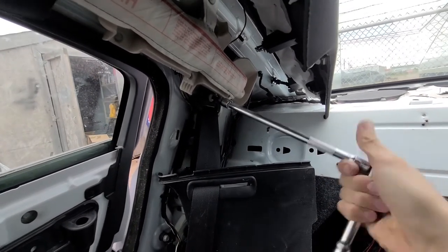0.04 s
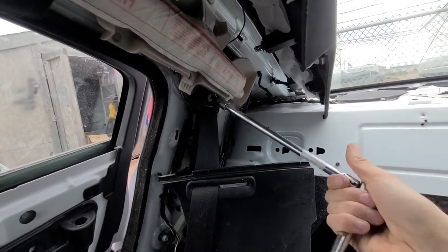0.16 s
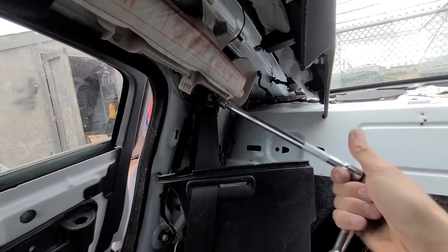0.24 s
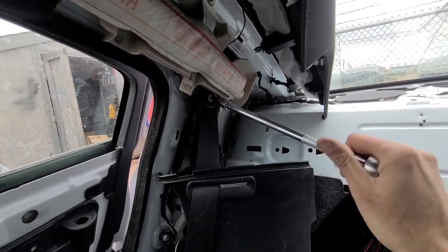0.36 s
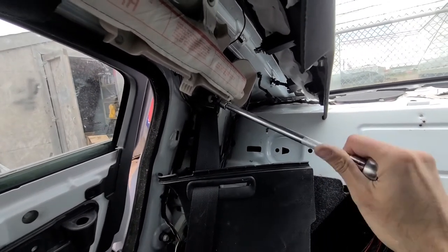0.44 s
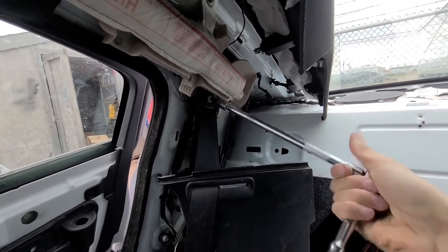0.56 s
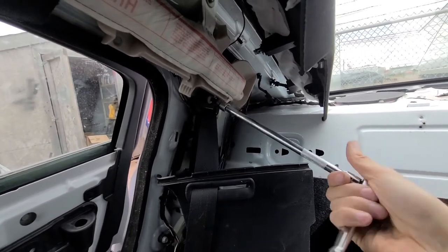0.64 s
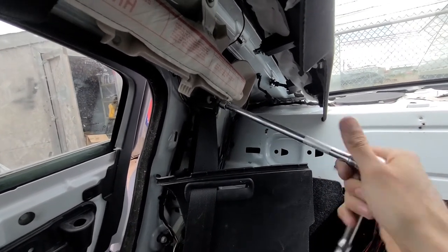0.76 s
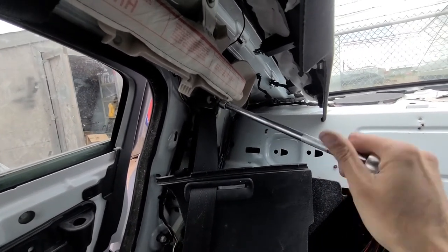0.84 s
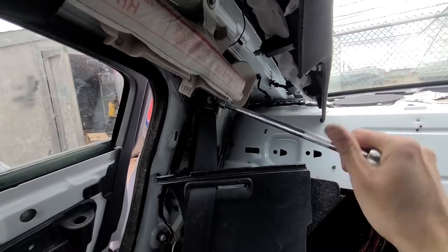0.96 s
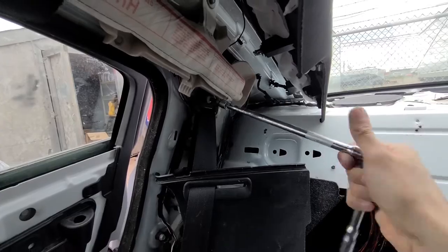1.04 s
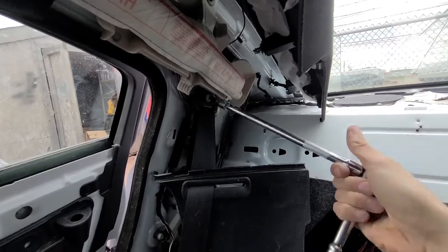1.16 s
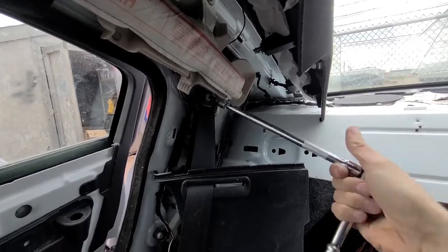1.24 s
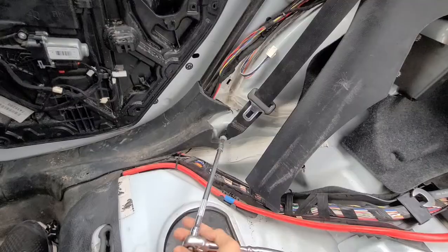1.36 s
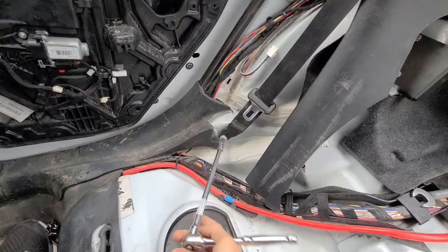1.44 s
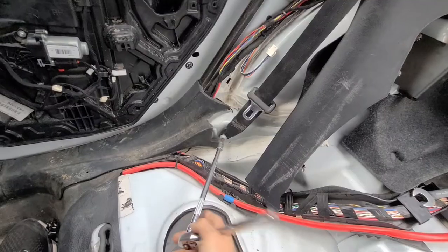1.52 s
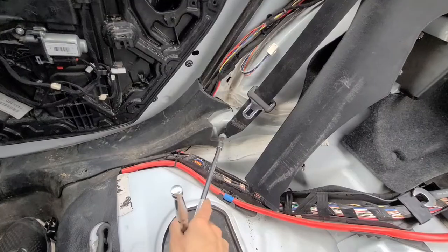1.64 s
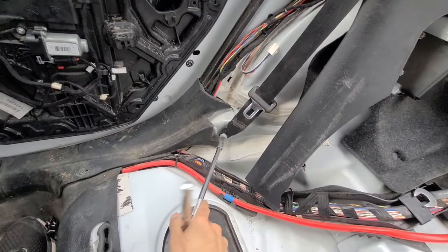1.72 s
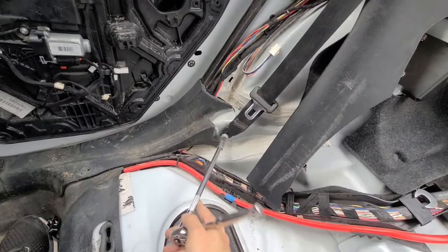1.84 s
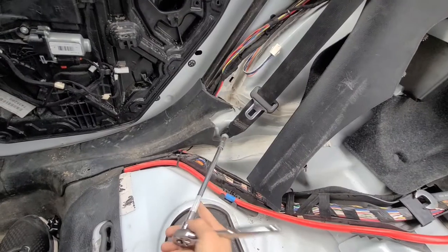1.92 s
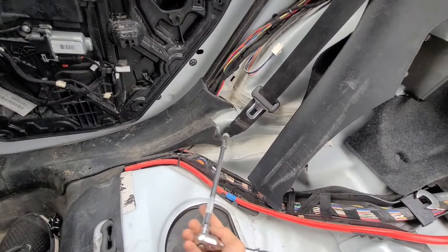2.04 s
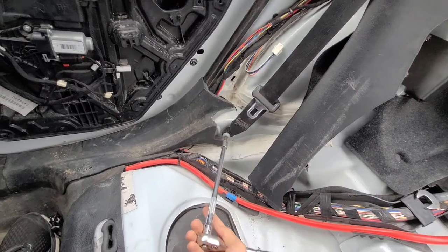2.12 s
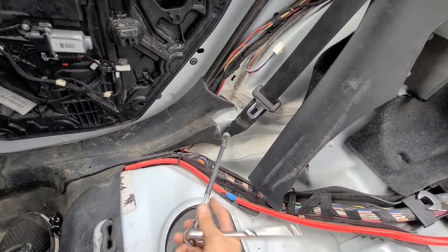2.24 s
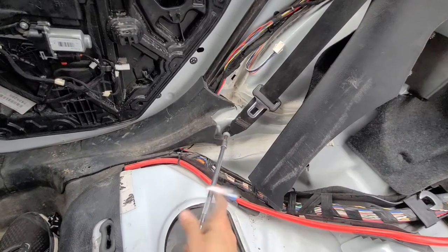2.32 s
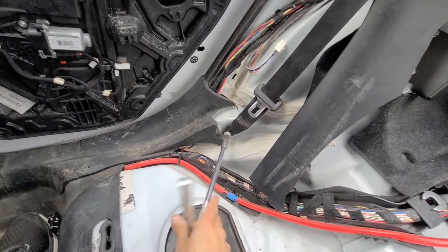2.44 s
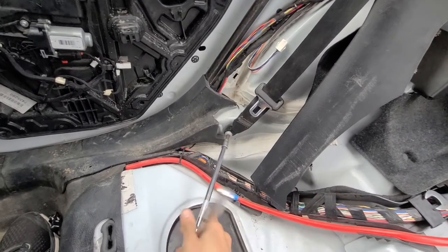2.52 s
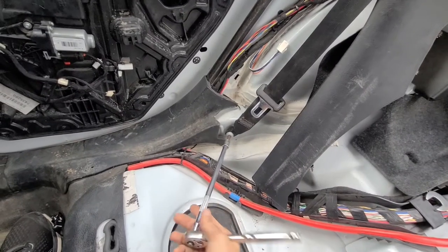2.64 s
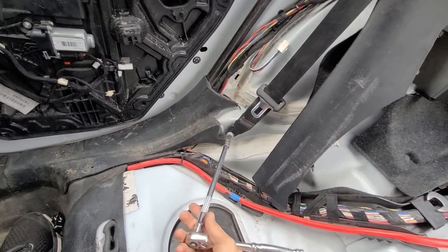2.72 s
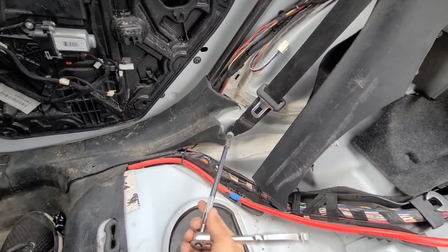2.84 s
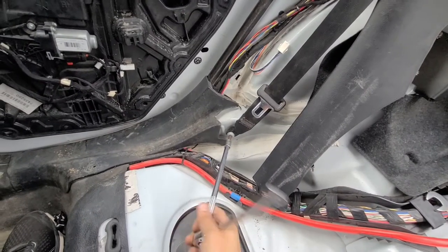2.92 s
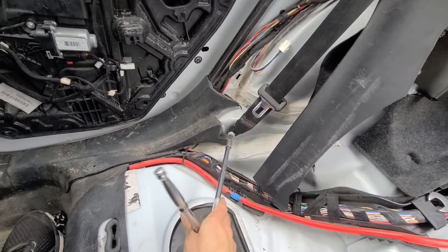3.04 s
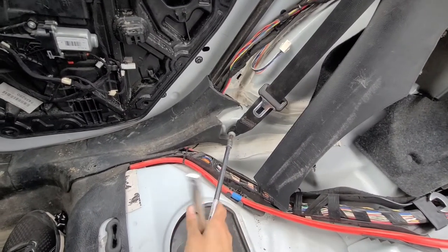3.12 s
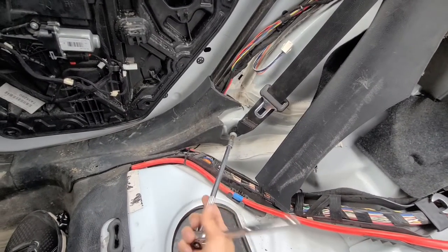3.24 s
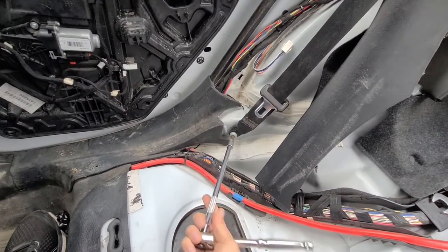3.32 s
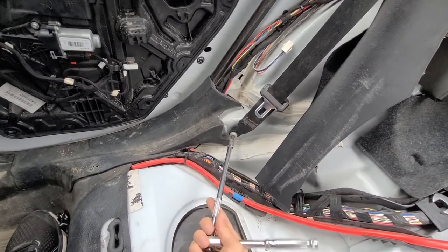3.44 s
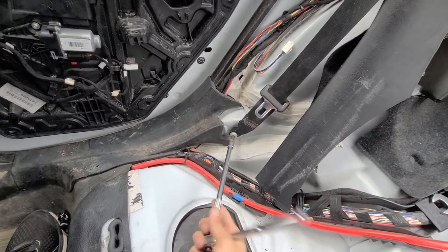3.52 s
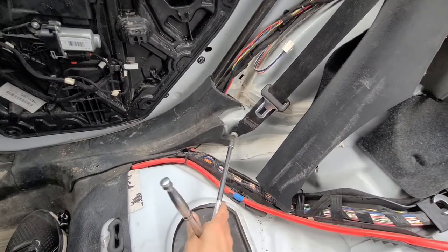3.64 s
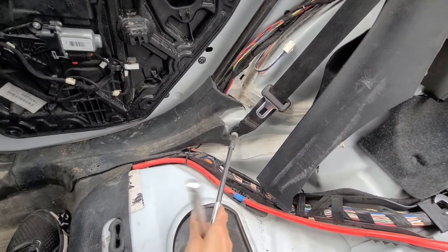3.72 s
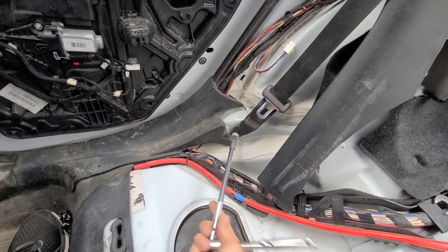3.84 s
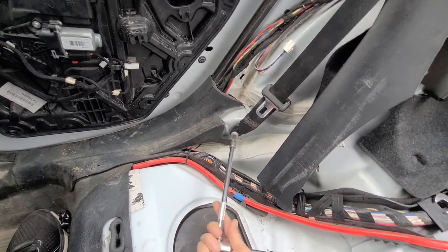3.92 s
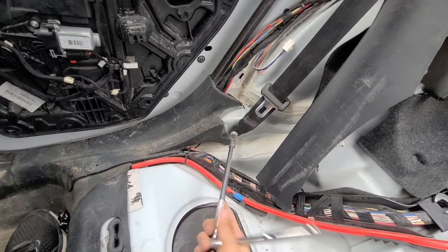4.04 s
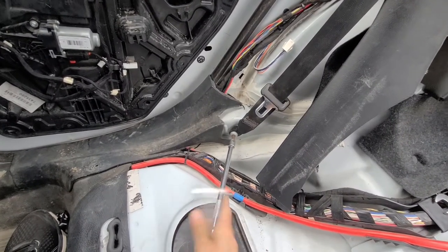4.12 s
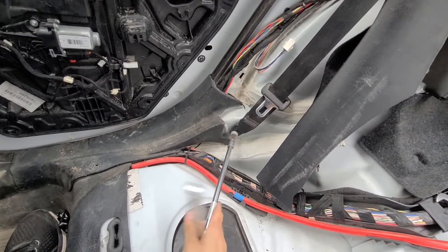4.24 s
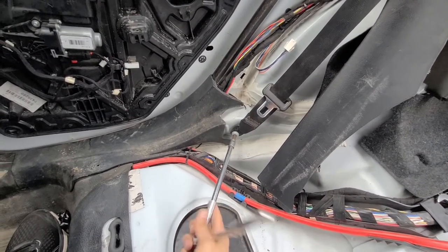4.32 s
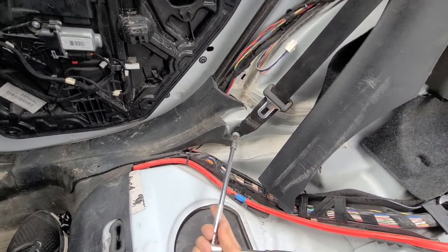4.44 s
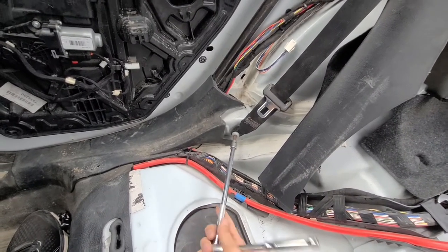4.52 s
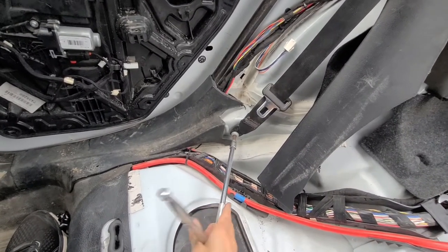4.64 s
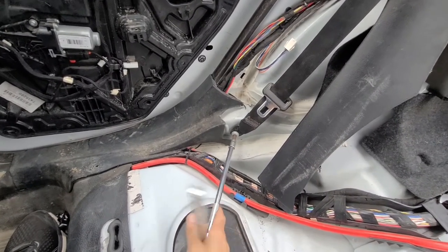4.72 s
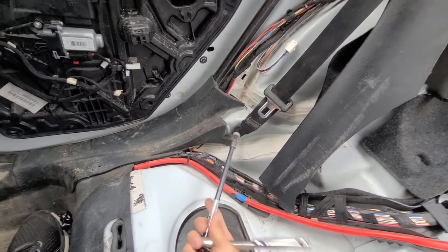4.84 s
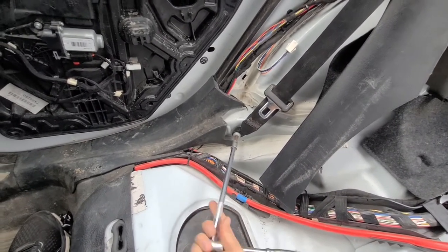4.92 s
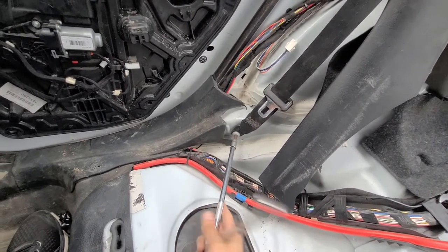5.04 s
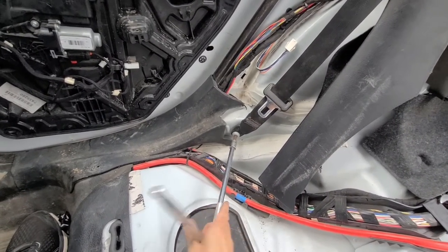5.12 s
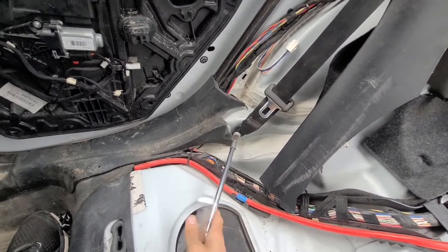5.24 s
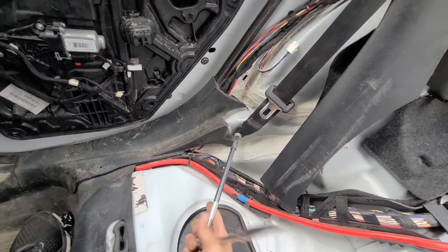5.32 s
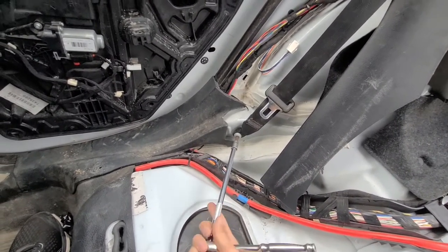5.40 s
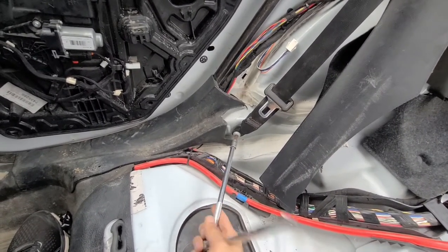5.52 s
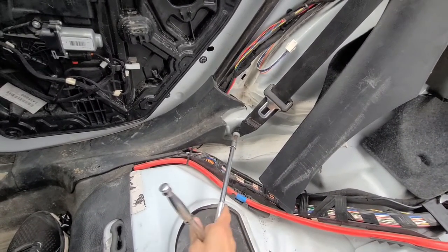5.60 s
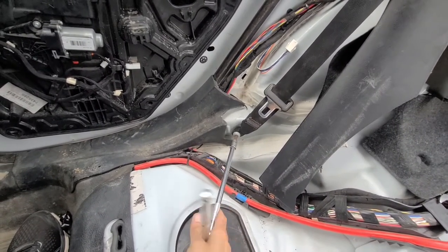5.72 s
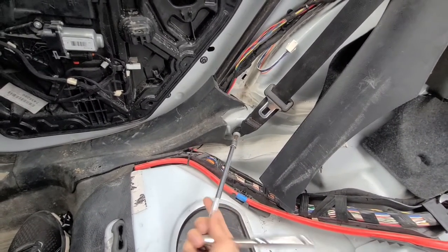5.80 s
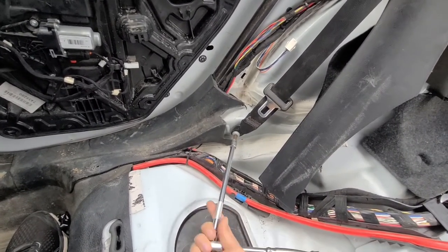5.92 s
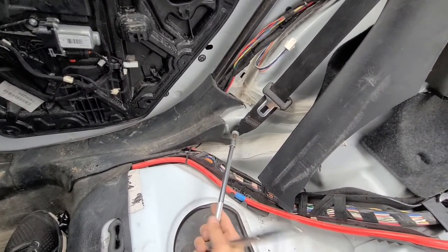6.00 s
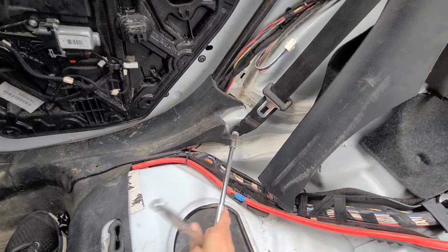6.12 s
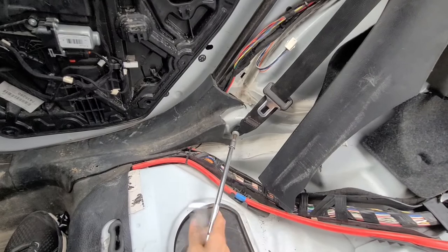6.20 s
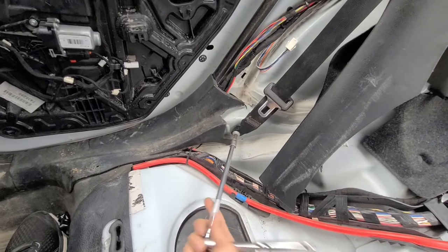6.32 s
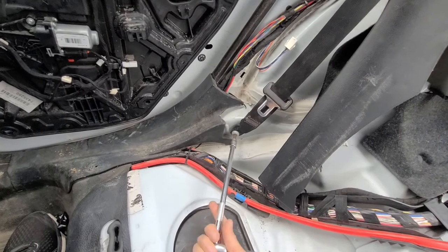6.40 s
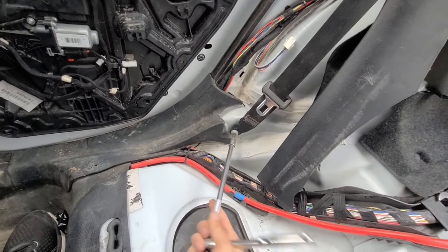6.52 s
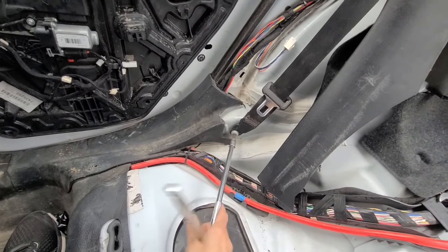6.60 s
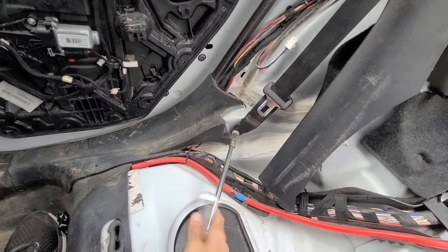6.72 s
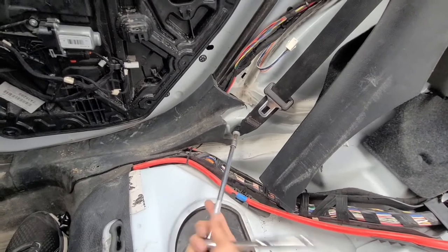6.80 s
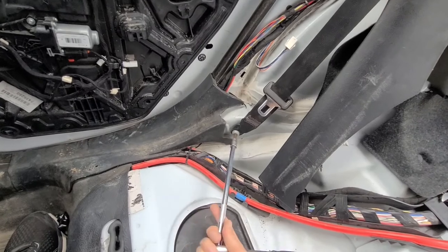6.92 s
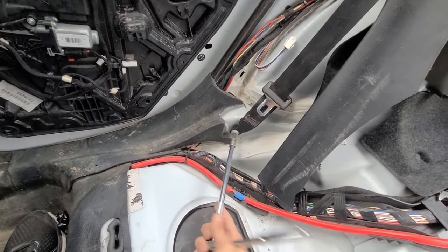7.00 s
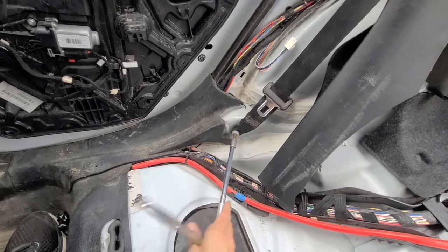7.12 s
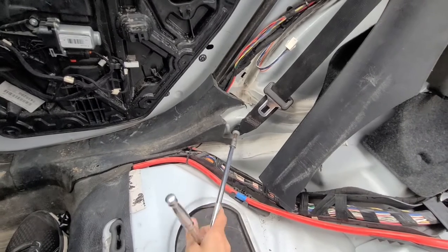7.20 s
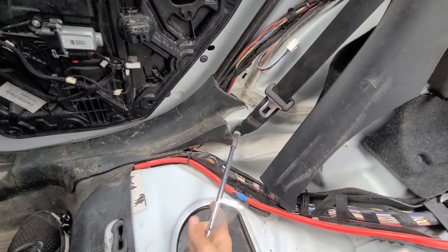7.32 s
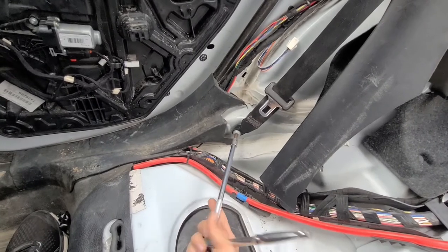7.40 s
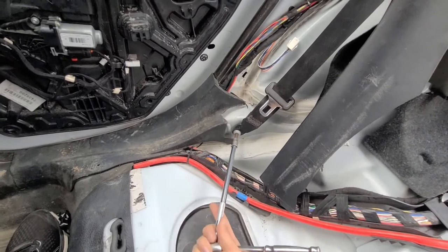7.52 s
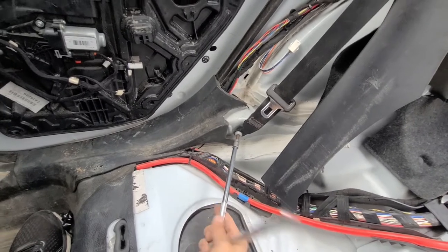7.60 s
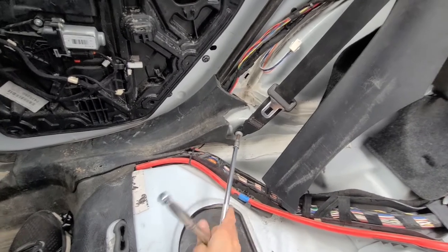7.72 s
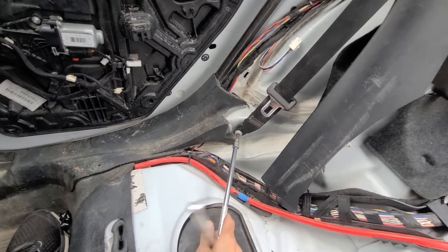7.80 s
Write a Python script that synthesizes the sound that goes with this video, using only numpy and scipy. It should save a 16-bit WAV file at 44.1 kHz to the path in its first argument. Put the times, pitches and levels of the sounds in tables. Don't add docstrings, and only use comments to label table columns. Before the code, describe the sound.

Heard close in stereo, a hand ratchet works inside a stripped car body. From 0 s dull, boomy knocks come through the door pillar, over a low hum from the leaning hand and a little rumble. A dense run of bright clicks rattles at 0.23-0.37 s, followed by loose knocks and clinks, then a second run at 0.71-0.86 s and a few more knocks. A small tick at 1.23 s leads into about 0.05 s of silence. Then the tighter floor pan: a short run at 1.47 s, others near 2.2 and 2.85 s, then crisp runs roughly every half second from 3.5 to 7.7 s. Each zip of clicks rings the steel bar; between them the pull brings a clink and a knock, the heaviest near 7.17 s. Faint socket scrapes, soft rumble and airy hiss stay underneath.

```python
import sys
import numpy as np
from scipy import signal
from scipy.fft import rfft, irfft, next_fast_len
from scipy.io import wavfile
from scipy.ndimage import uniform_filter1d

SR = 44100
rng = np.random.default_rng(int(sys.argv[2]) if len(sys.argv) > 2 else 0)


def volts_from_db(level):
    exponent = np.asarray(level, float) / 20
    return 10 ** exponent


def store_wav(level_fs):
    pcm = np.round(np.clip(np.atleast_2d(level_fs), -1, 1) * 32767)
    wavfile.write(sys.argv[1], SR, pcm.T.astype(np.int16))


N = 346626
SIZE = 5120
LEAD_MS = 10

# start_s, end_s
CUT = (1.2397, 1.2943)
# pitch_hz, width_hz, level_db
PILLAR_MODES = [(114, 34, -5.5), (199.7, 9, 2.5), (270, 29, -5), (363, 120, 0), (470, 15.5, 2.5),
                (551, 15, 0), (744, 112, -4), (1133, 133, -7.5), (1500, 55, -10.5), (2010, 280, -19.5)]
# pitch_hz, width_hz, level_db
PAN_MODES = [(106, 45, -28.5), (280, 20.2, 1), (450, 32, -1), (567, 15.2, -1.5), (660, 25, 5), (828, 16, 5),
             (1183, 31, 2.5), (1372, 117, -3), (1890, 103, -2), (2124, 88, -4)]
# pitch_hz, width_hz, level_db
FLOOR_MODE = (105, 26.4, 1.5)
# first_snap_s, last_snap_s
SWINGS = [(.234, .374), (.712, .86), (1.471, 1.568), (2.197, 2.335), (2.851, 3.003), (3.477, 3.605),
          (4.005, 4.137), (4.513, 4.64), (4.994, 5.128), (5.5, 5.581), (5.988, 6.096), (6.489, 6.593),
          (7.0, 7.143), (7.599, 7.687)]


def read(points, hz):
    f, value = np.transpose(points)
    return np.interp(np.log(hz + 1), np.log(f + 1), value)


def evened(x):
    return x / np.sqrt(np.mean(np.abs(x[0]) ** 2) + 1e-20)


def modes(table, hz, spread_db):
    f, width, db = np.transpose(table)[:, :, None]
    loads = volts_from_db(db + spread_db * rng.standard_normal(f.shape))
    loads = loads * rng.choice([-1, 1], f.shape)
    return (loads / (1 + 2j * (hz - f) / width)).sum(0)


def tilt(hz, db, pivot_hz):
    return volts_from_db(db * hz ** 2 / (hz ** 2 + pivot_hz ** 2))


def burst(rise_ms, start, hold_ms, tail_ms, tail_db, grit_db):
    ms = np.arange(SIZE) * 1000 / SR - LEAD_MS
    lead_in = .14 * (1 + ms / LEAD_MS) ** 2
    swell = np.where(ms < 0, lead_in, start + (1 - start) * np.clip(ms / rise_ms, 0, 1))
    after = np.maximum(ms - rise_ms, 0)
    tail = volts_from_db(min(tail_db, -7)) * np.exp(-(after / tail_ms) ** 2)
    fall = np.exp(-(after / hold_ms) ** 2) + tail
    wobble = uniform_filter1d(rng.standard_normal(SIZE), size=16)
    grit = volts_from_db(grit_db * 3.13 * wobble)
    return swell * fall * grit * rng.standard_normal((2, SIZE))


def add(mix, s, db, drive, response, peak_ms):
    fade = np.minimum(np.linspace(4, 0, SIZE), 1)
    sound = irfft(rfft(drive) * response, SIZE) * fade
    peak = uniform_filter1d(sound[0] ** 2, size=round(peak_ms * SR / 1000)).max()
    begin = round((s - LEAD_MS / 1000) * SR)
    part = mix[:, begin:][:, :SIZE]
    part += (volts_from_db(db) / np.sqrt(peak) * sound)[:, :part.shape[1]]


def drone(colour, level_db, patchy_db):
    frames, hz = N // 256 + 5, np.fft.rfftfreq(1024, 1 / SR)
    a, b, c, d, patches = rng.standard_normal((frames, 513, 5)).T
    patches = uniform_filter1d(patches, size=10, axis=0)
    patches = uniform_filter1d(patches, size=10, axis=1) * 10
    spectrum = np.array([a + 1j * b, c + 1j * d])
    spectrum = spectrum * volts_from_db(read(colour, hz)[:, None] + patchy_db * patches)
    noise = signal.istft(spectrum, nperseg=1024, noverlap=768)[1][:, :N]
    return volts_from_db(level_db) * evened(noise)


def leaning_hum():
    # pitch_hz, level_db (per Hz)
    colour = [(50, -31), (110, 8), (190, 5.5), (280, 6), (450, -12.5), (800, -24), (2000, -69)]
    # start_s, level_db
    leaning = [
        (0, -29),
        (.08, -26.5),
        (.17, -34.5),
        (.33, -34),
        (.55, -39),
        (.7, -37),
        (.9, -34),
        (1.04, -40.5),
        (1.12, -57),
        (1.2, -71),
    ]
    level_db = np.interp(np.arange(N) / SR, *np.transpose(leaning), right=-120)
    return drone(colour, level_db, 2.9)


def rumble_and_hiss():
    # pitch_hz, level_db (per Hz)
    rumble = [(30, -24.5), (50, 7), (78, 0.5), (130, -21), (250, -17.5), (600, -34), (1500, -67.5)]
    # pitch_hz, level_db (per Hz)
    hiss = [(400, -0.5), (830, 17.5), (970, -1), (1180, 13), (1700, -0.5), (4000, -5), (7500, -12.5),
            (9200, -13.5), (11800, -13), (15500, -21)]
    # start_s, level_db
    stir_points = [(.06, -27), (.14, -50), (.5, -25), (.66, -52), (.97, -33), (1.06, -32.5), (1.11, -61),
                   (1.24, -42), (1.3, -48), (1.95, -50), (2.7, -49), (3.8, -46), (5.3, -49.5), (6.28, -46),
                   (6.9, -48.5), (7.45, -49.5), (7.86, -43.5)]
    pull_db, pull_after_s, pull_width_s = 6.5, 0.257, 0.069
    t = np.arange(0, N, 100) / SR
    at_pillar = t < CUT[0]
    pulls = sum(np.exp(-((t - first - pull_after_s) / pull_width_s) ** 2) for first, _ in SWINGS)
    stir_db = np.interp(t, *np.transpose(stir_points)) + pull_db * pulls * ~at_pillar
    base_db = np.where(at_pillar, -58.5, -51)
    share = np.where(at_pillar, 0.8, 0.95)
    hiss_db = base_db + share * (stir_db + 40)
    rumble_db, hiss_db = [np.repeat(db, 100)[:N] for db in (stir_db, hiss_db)]
    return drone(rumble, rumble_db, 0.61) + drone(hiss, hiss_db, 1.6)


def knocks(rows, panel, plain_db, hold_ms, thud_db, boom_db, contact_db):
    out, hz = np.zeros((2, N)), np.fft.rfftfreq(SIZE, 1 / SR)
    damped = [(f, width * 1.7, db) for f, width, db in panel]
    large_sheets = [FLOOR_MODE] + [(f, width * 1.07, 0) for f, width, _ in panel[:3]]
    thud = volts_from_db(thud_db) / (1 + 1j * hz / 3000) ** 3 * hz / (hz + 150)
    for s, db, rise_ms, bright_db, sings_hz in rows:
        bent_hz = hz * (1 + .012 * rng.standard_normal())
        body = modes(damped, bent_hz, spread_db=2.5) + thud
        body = body * tilt(hz, bright_db - plain_db, pivot_hz=750)
        low, high = round(.8 * sings_hz * SIZE / SR), round(1.25 * sings_hz * SIZE / SR)
        nearby = np.abs(body)[low:high].max()
        body = body + nearby * .9 / (1 + 2j * (hz - sings_hz) / (30 + .05 * sings_hz))
        add(out, s, db, burst(max(rise_ms, 1), .4, hold_ms, 28, -8, grit_db=2.5), body, 6)
        contact = burst(0.52, 0.37, 1.0, 4, -29, grit_db=1.5)
        add(out, s, db + contact_db, contact, thud * hz / (hz + 800), 3)
        boom = modes(large_sheets, hz, spread_db=-4.0)
        swell = burst(23.0, 0.2, 27, 66, 6.5, grit_db=-1.0)
        add(out, s, db + boom_db - 0.27 * bright_db, swell, boom, 10)
    return out


def pillar_knocks():
    # start_s, level_db, rise_ms, brightness_db, strongest_mode_hz
    rows = [(0.012, -15, 0.99, -14.5, 313), (0.104, -19, 3, -26, 270), (0.192, -20.5, 3.5, -19, 406),
            (0.257, -16, 4.5, -11, 203), (0.316, -35, 22, 14, 470), (0.391, -34.5, 37, -33.5, 148),
            (0.44, -28, 46, -13, 320), (0.46, -26, 12, -9.5, 280), (0.483, -26, 65, -26, 177),
            (0.547, -26, 22, -20.5, 388), (0.608, -18.5, 10.5, -18.5, 450), (0.622, -27, 5.3, -19, 390),
            (0.645, -29, 88, -22, 159), (0.868, -32, 71, -16, 147), (0.939, -22, 15.4, -9.5, 453),
            (1.007, -22.5, 8.9, -13, 190), (1.029, -40.5, 68, -50, 180), (1.074, -59, 13, -33, 178),
            (1.116, -47, 5, -49, 196)]
    return knocks(rows, PILLAR_MODES, -4.0, 3.3, -32.5, -22.0, -26.5)


def thumps():
    # start_s, level_db
    shoves = [(.012, -36.5), (0.102, -29.5), (.257, -38.5), (.3, -27.5), (.345, -23.5), (.49, -28.5),
              (0.607, -25), (1.401, -38.5), (2.439, -22.5), (2.469, -28), (2.511, -41), (3.051, -33.5),
              (3.413, -35), (4.217, -47), (4.696, -32), (5.159, -41), (6.16, -51), (6.697, -37),
              (6.956, -51), (7.17, -32), (7.563, -28.5), (7.803, -38)]
    out, hz = np.zeros((2, N)), np.fft.rfftfreq(SIZE, 1 / SR)
    for s, db in shoves:
        sheets = modes([FLOOR_MODE, (125, 40, 0), (180, 50, -3)], hz, spread_db=0.5)
        add(out, s, db, burst(6.0, 0.49, 26, 48, -7, grit_db=5.5), sheets, 15)
    return out


def hand_points():
    # treble_db (head turned to the microphone), push_db (into the panel)
    grips = [
        [7.5, 1.5],
        [20.5, 0.5],
        [9, -15],
        [9, -10.5],
        [-0.5, -13],
        [-2, -17.5],
        [-7, -12.5],
        [-3, -13.5],
        [-5, -15.5],
        [-6.5, -21],
        [-5.5, -13.5],
        [-5, -16],
        [-8, -12.5],
        [-6, -17.5],
    ]
    hand = [(0.0035, 5, 4)]
    for (first, last), (treble_db, push_db) in zip(SWINGS, grips):
        hand.append((first, treble_db, push_db))
        hand.append((last, treble_db - 3, push_db + 1))
    return hand


def steel_snaps():
    # start_s, level_db
    teeth = [(0.2333, -28), (0.2489, -29), (0.2583, -26), (0.2713, -31), (0.2817, -27), (0.2929, -26),
             (0.2972, -26), (0.309, -26), (0.3215, -25), (0.3352, -22), (0.3536, -37), (0.3726, -33),
             (0.7119, -25), (0.7243, -20), (0.7376, -25), (0.7491, -25), (0.7578, -25), (0.7706, -29),
             (0.7787, -24), (0.7887, -26), (0.8007, -32), (0.8123, -26), (0.8254, -30), (0.8431, -33),
             (0.8611, -34), (1.4704, -22), (1.4934, -22), (1.5106, -24), (1.528, -24), (1.5458, -32),
             (1.5679, -33), (2.1969, -20), (2.2158, -22), (2.2315, -23), (2.2449, -24), (2.2563, -27),
             (2.2688, -30), (2.2789, -31), (2.2935, -32), (2.3138, -33), (2.3343, -36), (2.851, -20),
             (2.87, -21), (2.8863, -23), (2.9008, -23), (2.9167, -22), (2.9288, -23), (2.9427, -22),
             (2.957, -23), (2.9751, -26), (3.0027, -31),
             (3.4769, -23), (3.4949, -23), (3.5107, -24), (3.5237, -24), (3.5378, -23), (3.5509, -20),
              (3.5642, -21), (3.5782, -26), (3.6046, -26), (4.0054, -24), (4.0262, -27), (4.0401, -25),
              (4.0529, -21), (4.0651, -21), (4.0741, -24), (4.0873, -23), (4.0987, -21), (4.107, -23),
              (4.1216, -22), (4.1374, -24), (4.5128, -19), (4.5294, -20), (4.5423, -20), (4.5546, -20),
              (4.5678, -23), (4.5806, -21), (4.5941, -23), (4.6106, -27), (4.6399, -32), (4.9943, -21),
              (5.0094, -20), (5.0211, -22), (5.0317, -21), (5.0425, -19), (5.0524, -19), (5.0628, -22),
              (5.0748, -24), (5.0905, -21), (5.1272, -23), (5.5006, -19), (5.5137, -19), (5.5238, -20),
              (5.5358, -20), (5.5476, -20), (5.5616, -25), (5.5813, -27),
             (5.9881, -21), (6.0028, -26), (6.013, -25), (6.025, -22), (6.0372, -24), (6.0473, -23),
            (6.0598, -22), (6.0758, -23), (6.0962, -27), (6.4893, -19), (6.5065, -19), (6.5192, -21),
            (6.5321, -20), (6.5434, -21), (6.5538, -20), (6.5649, -20), (6.5774, -21), (6.5929, -24),
            (6.9993, -19), (7.0108, -20), (7.0219, -17), (7.0315, -20), (7.0409, -21), (7.0512, -24),
            (7.0603, -24), (7.0707, -26), (7.085, -25), (7.1046, -27), (7.1439, -34), (7.5994, -23),
            (7.6112, -20), (7.6216, -21), (7.6341, -21), (7.6467, -24), (7.6633, -23), (7.6866, -26)]
    # start_s, level_db
    seats = [(0.2, -35), (0.6977, -44), (1.387, -40.5), (2.1294, -51), (2.8117, -41), (3.4318, -33),
             (3.949, -46), (4.475, -37), (4.954, -32.5), (5.472, -34), (5.96, -28.5), (6.4524, -29.5),
             (6.9759, -28), (7.5793, -27.5)]
    # start_s, level_db
    pillar_clinks = [(.0126, -63), (0.1049, -37.5), (.1278, -64), (0.4385, -34), (0.4495, -32.5),
                     (0.489, -55), (0.5307, -48), (0.5545, -36.5), (0.6074, -39.5), (0.629, -57),
                     (0.6682, -50), (0.9115, -47.5), (0.9357, -28), (0.9456, -39), (0.9923, -47),
                     (1.0083, -65), (1.0358, -51)]
    # start_s, level_db
    pan_clinks = [(1.714, -46), (1.734, -36), (2.438, -41), (2.4647, -37), (2.4846, -35.5), (3.0534, -58),
                  (3.071, -26.5), (3.2456, -22), (3.6622, -57), (3.6974, -42), (3.721, -41.5), (4.179, -43),
                  (4.215, -25), (4.675, -27), (4.6966, -32), (4.8538, -46.5), (5.1576, -25.5),
                  (5.322, -50.5), (5.6656, -44), (5.6753, -40.5), (5.786, -50), (5.823, -51),
                  (6.1526, -25.5), (6.173, -23.5), (6.4365, -35), (6.6953, -35), (7.1721, -22),
                  (7.3212, -44), (7.79, -38.5), (7.8058, -28.5),
                  (1.684, -58), (1.707, -52), (2.4064, -46), (2.4217, -62), (2.632, -60), (2.725, -59),
               (2.803, -44), (3.93, -52), (3.999, -34), (4.204, -31), (4.683, -35), (4.89, -58),
               (5.64, -50), (5.9408, -45), (6.136, -39), (6.159, -26), (6.652, -45), (6.959, -44),
               (7.292, -49), (7.5666, -44), (7.74, -60)]
    return sorted(teeth + seats + pillar_clinks + pan_clinks)


def pawl(snaps, tool, panel, hold_ms, tail_ms, shade_db):
    # pitch_hz, level_db
    crack_colour = [(700, -13.5), (2000, -14), (4000, -8), (6500, -8), (9000, -10), (12000, -12),
                    (15500, -22)]
    out, hz = np.zeros((2, N)), np.fft.rfftfreq(SIZE, 1 / SR)
    when, treble_db, push_db = np.transpose(hand_points())
    shade = volts_from_db(shade_db * hz ** 8 / (hz ** 8 + 4300. ** 8))
    crack = (.6, 0.6, hold_ms, tail_ms, -3.5, 1.5)
    shove = (2.5, 0.69, 17.1, 38.7, -7, 1.8)
    plain = volts_from_db(read(crack_colour, hz))
    click = 5.0 * (np.arange(SIZE) == round((LEAD_MS + .6) * SR / 1000)) * np.c_[[1, .6]]
    chatter = burst(*crack)
    for s, db in snaps:
        steel = plain + volts_from_db(1.5) * modes(tool, hz, spread_db=2)
        bright_db = np.interp(s, when, treble_db) + 0.37 * (db + 42.0)
        steel = steel * shade * tilt(hz, bright_db, pivot_hz=6400)
        chatter = .6 * chatter + .8 * burst(*crack)
        add(out, s - .001, db, chatter + click, steel, 3)
        push = modes(panel, hz, spread_db=2.0) * tilt(hz, 2.0, pivot_hz=700)
        add(out, s, db + np.interp(s, when, push_db), burst(*shove), push, 6)
    return out


def pillar_ratchet(snaps):
    # pitch_hz, width_hz, level_db
    tool = [(3100, 260, 2), (4080, 250, -7), (6270, 400, -8), (7900, 300, -9)]
    here = [row for row in snaps if row[0] < CUT[0]]
    return pawl(here, tool, PILLAR_MODES, 7.0, 24, -10.5)


def tick():
    # start_s, level_db
    moment = (1.2305, -40)
    out, hz, step = np.zeros((2, N)), np.fft.rfftfreq(SIZE, 1 / SR), np.zeros((2, SIZE))
    step[:, round(LEAD_MS * SR / 1000)] = 1
    swing_back = 1j * hz / (1 + 1j * hz / 500) ** 2 / (1 + 1j * hz / 6000)
    add(out, *moment, step, swing_back, 2)
    return out


def pan_knocks():
    # start_s, level_db, rise_ms, brightness_db, strongest_mode_hz
    turns = [(1.373, -33.5, 21, -3.5, 1760), (2.166, -44, 4.8, -18, 232), (2.778, -23.5, 7.4, -21, 624),
             (3.411, -24, 10, -10.5, 326), (3.929, -30, 14.6, -15.5, 1090), (4.449, -34, 5.2, -6, 264),
             (4.928, -30, 2.1, -22, 820), (5.452, -30, 14, -0.5, 1200), (5.922, -23.5, 2, -15, 825),
             (6.435, -28.5, 4, -15, 450), (6.958, -23.5, 6.4, -7.5, 1120), (7.561, -26.5, 1.9, -12, 500),
             (7.575, -23.5, 6.4, -25, 286)]
    # start_s, level_db, rise_ms, brightness_db, strongest_mode_hz
    loads = [(1.555, -29, 18, -5, 660), (1.732, -31.5, 6.3, 3, 1830), (2.198, -41, 1.3, 41, 1720),
             (2.26, -24.5, 55, 2.5, 820), (2.405, -31, 19, -16, 284), (2.44, -20.5, 0.87, -6, 1520),
             (2.474, -25, 7.2, -6, 1730), (3.051, -23.5, 22.6, -4.5, 630), (3.246, -18.5, 0.94, 4, 1730),
             (3.676, -27, 14.7, -4.5, 830), (4.098, -31, 12, -1, 1860), (4.217, -19.5, 3.9, -11, 650),
             (4.696, -20.5, 0.88, 0, 1790), (5.16, -19, 8.4, -4, 715), (5.64, -31, 28, -4, 805),
             (6.067, -29.5, 2.1, -9, 820), (6.162, -18, 19.7, -5.5, 1085), (6.268, -36, 20, -3, 1110),
             (6.639, -29.5, 13, 0, 700), (6.67, -28, 9.4, 0, 715), (6.696, -22.5, 0.83, -5.5, 1910),
             (7.143, -32, 1.8, -3, 1900), (7.167, -12.5, 10.5, -1, 690), (7.739, -30, 18, -16, 807),
             (7.775, -34, 12, -11, 850), (7.805, -24.5, 1.1, 7, 1890)]
    # start_s, level_db, brightness_db
    nudges = [(1.629, -44.5, -27), (2.1, -42, -28), (2.5, -46, -31), (2.707, -52, -58), (3.169, -48, -32),
              (3.28, -47, 3), (3.659, -42, -16), (3.758, -44.5, -12), (4.192, -30.5, -21), (4.674, -28, -4),
              (4.415, -46, -10), (4.899, -40.5, -24), (5.438, -43, -31), (5.675, -33, -8), (5.774, -45, 9),
              (5.82, -42.5, -19), (6.363, -48.5, -13), (6.805, -36.5, -3), (6.944, -35, -31)]
    # start_s, level_db
    scrapes = [
        (2.518, -48.5),
        (6.756, -40),
        (6.773, -43.5),
        (7.29, -45.5),
        (7.32, -45),
    ]
    rows = loads + turns
    rows = rows + [(s, db, 6.3, bright_db, 820) for s, db, bright_db in nudges]
    rows = rows + [(s, db, 25, 18, 1975) for s, db in scrapes]
    return knocks(rows, PAN_MODES, 5.6, 14.5, -6.5, -16.5, -18.5)


def pan_ratchet(snaps):
    # pitch_hz, width_hz, level_db
    tool = [(2660, 130, -5), (3500, 170, -4), (4190, 110, -1), (5650, 250, -9), (6900, 300, -6),
            (7800, 180, -6), (10000, 400, -10), (12100, 300, -7)]
    # pitch_hz, width_hz, level_db
    bar = (760, 18.3, 5.5)
    here = [row for row in snaps if row[0] > CUT[1]]
    return pawl(here, tool, PAN_MODES + [bar], 2.73, 19.1, -2.0)


def two_ports(mix):
    # pitch_hz, side_minus_mid_db
    sides = [(60, -23), (240, -11), (600, -8), (1100, -1.5), (3770, -0.5), (15000, -1)]
    # pitch_hz, left_minus_right_db
    balance = [(500, 1.1), (1500, 3.5), (8000, 2), (15000, 1)]
    # pitch_hz, share (0-1)
    alike_points = [(500, 0.88), (12000, 0.04)]
    size = next_fast_len(N)
    hz = np.fft.rfftfreq(size, 1 / SR)
    bass_loss = hz ** 2 / (hz ** 2 + 55 ** 2) * hz ** 4 / (hz ** 4 + 34.0 ** 4)
    mid, loose = rfft(mix, size) * bass_loss
    alike = np.clip(read(alike_points, hz), 0, 1)
    side = np.sqrt(1 - alike ** 2) * loose - 1j * alike * mid
    side = side * volts_from_db(read(sides, hz))
    lean = volts_from_db(read(balance, hz) / 2)
    ports = irfft(np.array([(mid + side) * lean, (mid - side) / lean]), size)[:, :N]
    right_db = 1.5 * (np.arange(N) < CUT[0] * SR)
    return volts_from_db(np.outer([-.5, .5], right_db)) * ports


def scene():
    snaps = steel_snaps()
    mix = leaning_hum() + rumble_and_hiss()
    mix += pillar_knocks() + thumps() + pillar_ratchet(snaps) + tick()
    mix += pan_knocks() + pan_ratchet(snaps)
    return two_ports(mix)


def band_limit(x):
    return signal.sosfilt(signal.butter(12, 16500, fs=SR, output="sos"), x)


def record(dry):
    t = np.arange(N) / SR
    wet = dry - .65 * signal.lfilter(*signal.iirpeak(9050, 16, SR), dry)
    wet = signal.oaconvolve(wet, signal.firwin(511, 15800, fs=SR)[None], "same")
    outside_s = np.maximum(CUT[0] - t, t - CUT[1])
    return band_limit(wet * np.clip(outside_s / .006, 0, 1))


dry = scene()
out = record(dry)
store_wav(out)
```